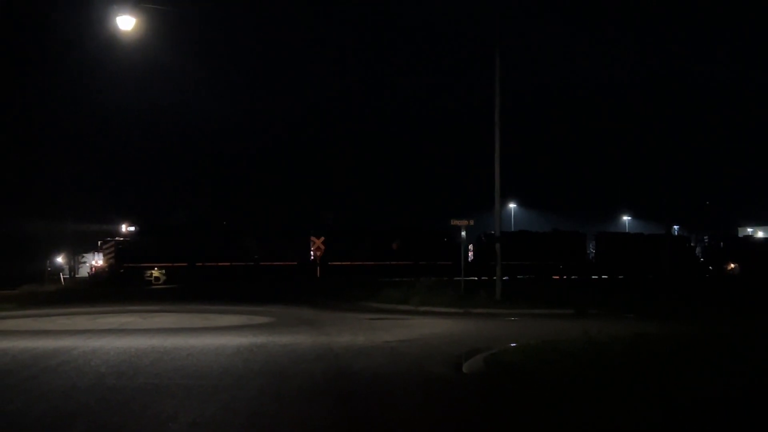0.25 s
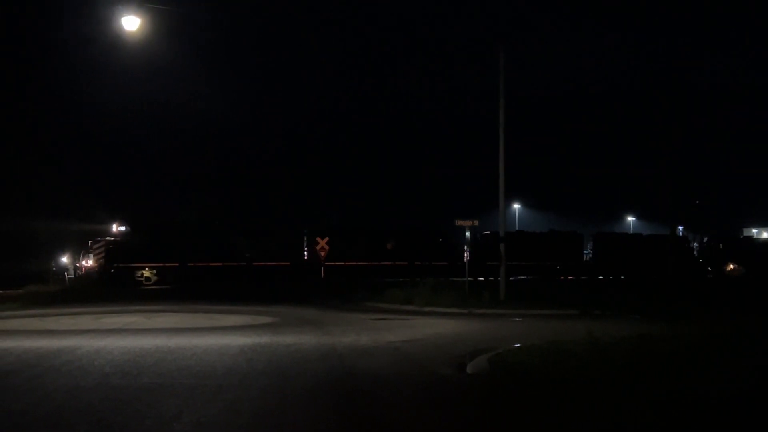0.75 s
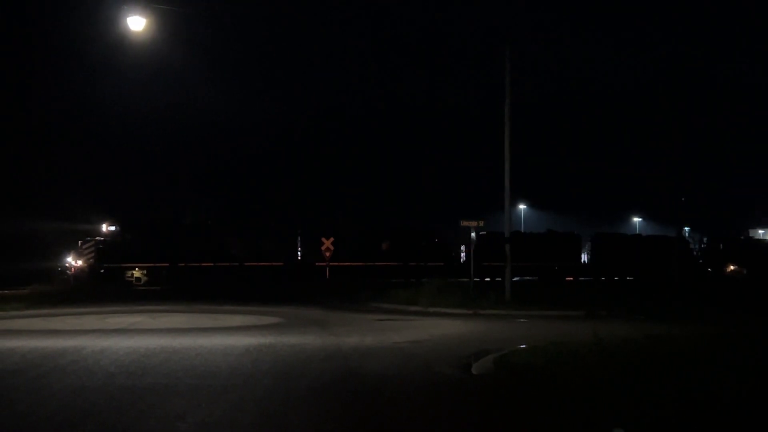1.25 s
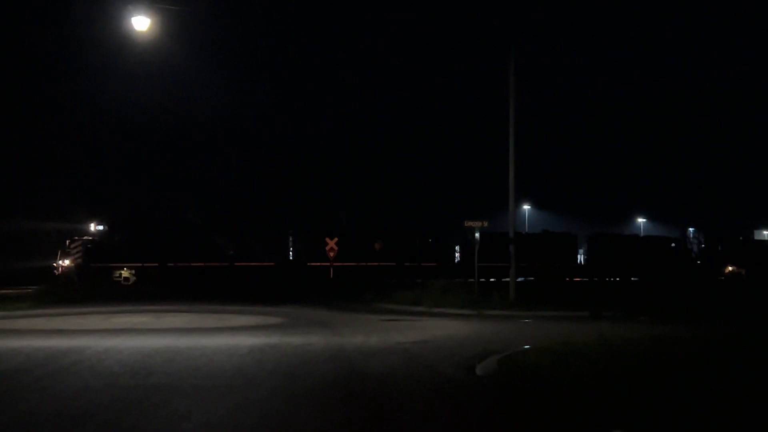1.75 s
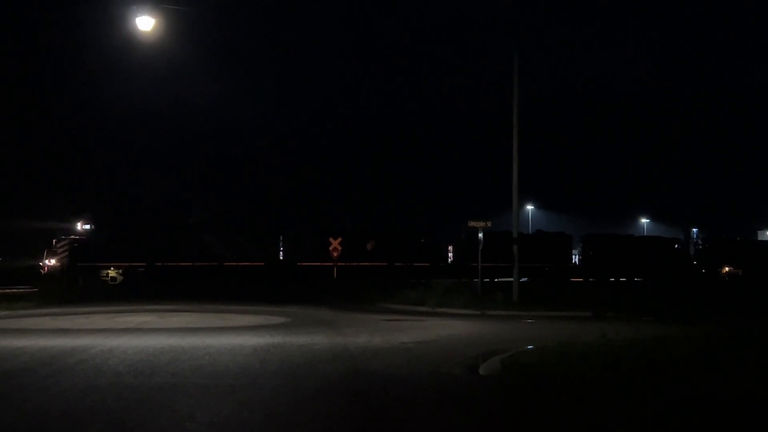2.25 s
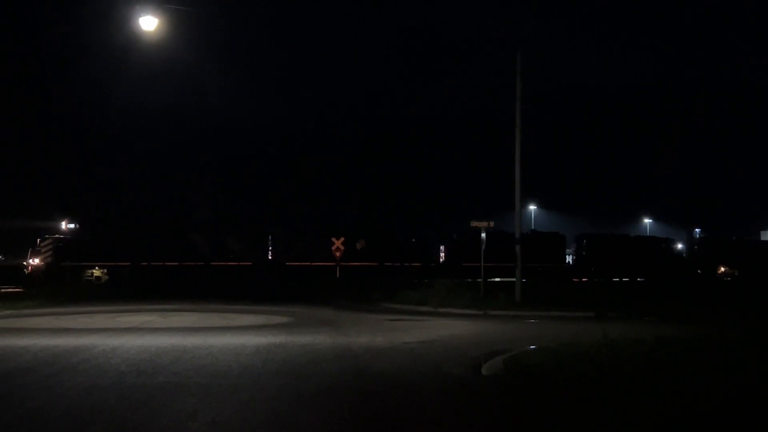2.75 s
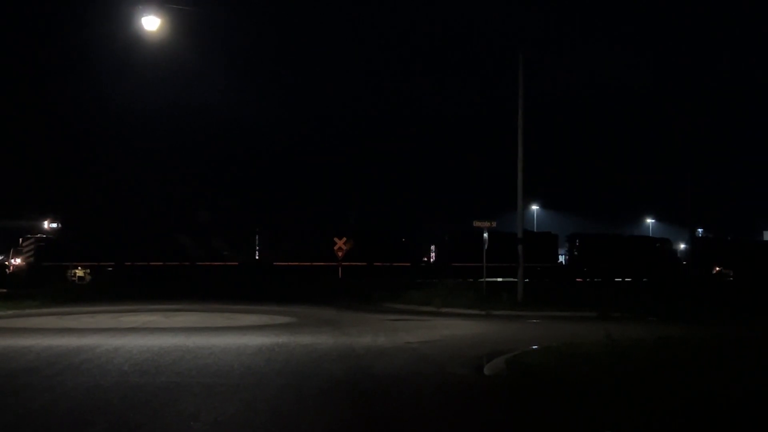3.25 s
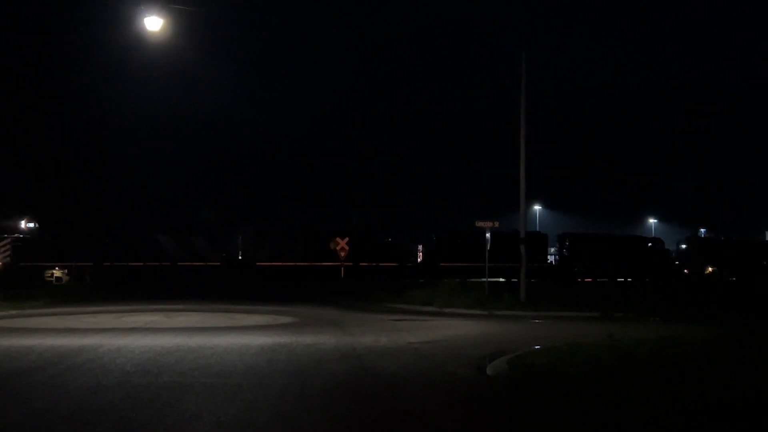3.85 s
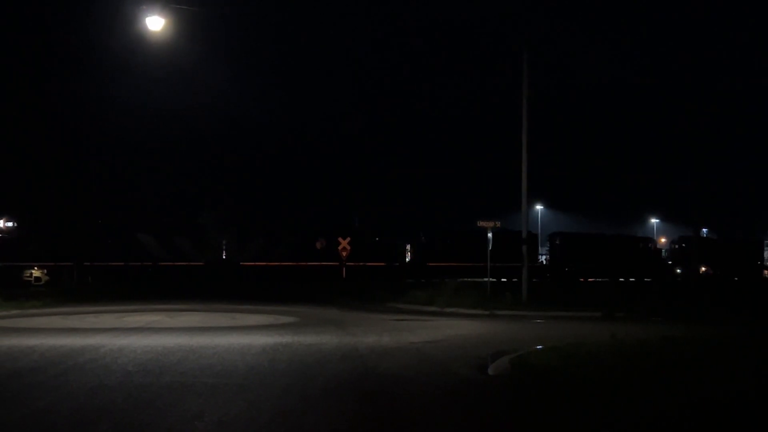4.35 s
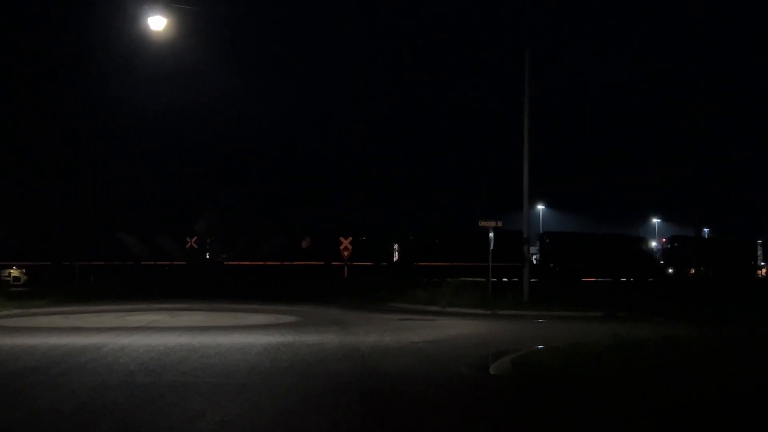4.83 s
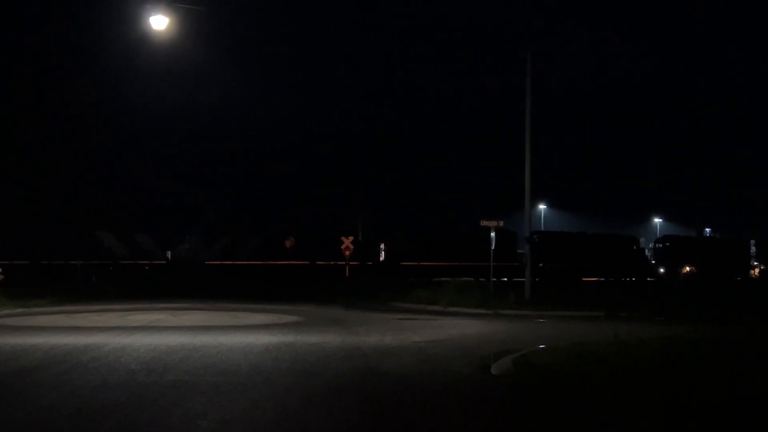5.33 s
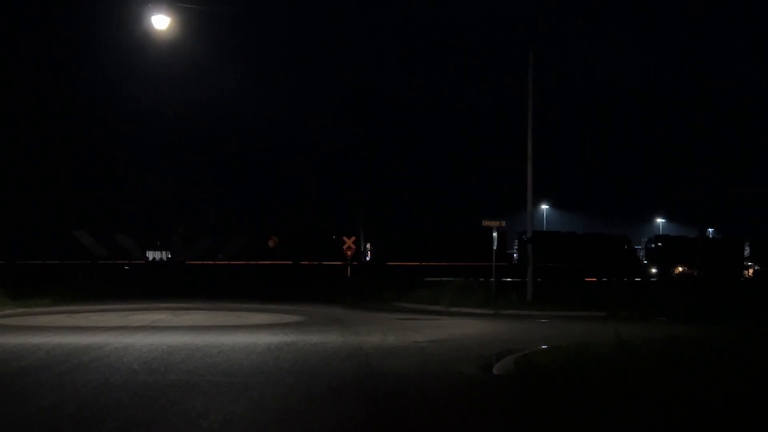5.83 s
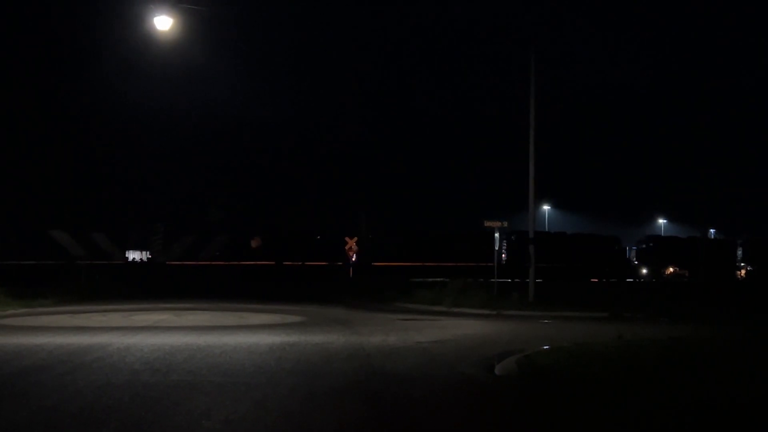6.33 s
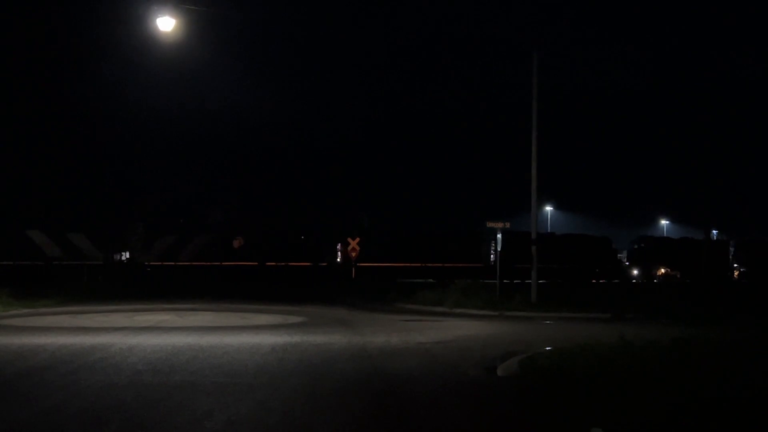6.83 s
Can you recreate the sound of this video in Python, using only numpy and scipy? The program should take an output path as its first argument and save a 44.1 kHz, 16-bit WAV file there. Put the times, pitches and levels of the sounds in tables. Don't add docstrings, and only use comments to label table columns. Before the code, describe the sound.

Open air at night beside a road crossing, a small stereo microphone some way from a freight train, with slightly dulled treble and little deep bass. From 0 s two large diesel locomotives work hard: dense, uneven exhaust throbs around 60 to 130 Hz slide in and out of step, under broad fan roar, wavering gear tones and a thin turbo whine near 6.8 kHz. A wheel clacks over a rail joint at 1.1 s, another more softly at 2.3 s. The whine and roar swell around 3 to 4 s; from 3.4 s rolling cars thicken the low roar and hollow ones start drumming near 90 Hz. From about 4.3 s both engines throttle down, beats slowing and whine gliding below 5 kHz by 7 s. Firm knocks land at 4.9 and 5.8 s, the latter with a thud. The lead engine's tones fade behind the cars, treble thins, and an empty car booms at 7 s.

```python
import sys
import numpy as np
from scipy import signal
from scipy.fft import rfft, irfft, next_fast_len
from scipy.io import wavfile

SR = 44100
rng = np.random.default_rng(int(sys.argv[2]) if len(sys.argv) > 2 else 0)


def dump_mix(stems):
    frames = np.atleast_2d(stems).T
    limited = np.clip(frames, -1, 1)
    pcm = np.round(limited * 32767).astype(np.int16)
    wavfile.write(sys.argv[1], SR, pcm)


def ratio_of_db(decibels):
    return 10 ** (np.asarray(decibels, float) / 20)


N = 312228
TIME = np.arange(N) / SR
LOG_HZ = np.log(np.fft.rfftfreq(2 * next_fast_len(N // 2 + 2048), 1 / SR) + 1)


def curves(table):
    s, *columns = np.transpose(table)
    return [np.interp(TIME, s, column) for column in columns]


def shape(x, table, turn=ratio_of_db):
    hz, value = np.transpose(table)
    padded = 2 * len(LOG_HZ) - 2
    gain = turn(np.interp(LOG_HZ, np.log(hz + 1), value))
    return irfft(rfft(x, padded) * gain, padded)[..., :N]


def unit(x):
    return x / np.sqrt(np.mean(np.abs(x) ** 2))


def walk(rate_hz):
    knots = rng.standard_normal(int(N / SR * rate_hz) + 2)
    whole, part = np.divmod(TIME * rate_hz, 1)
    whole = whole.astype(int)
    ease = part ** 2 * (3 - 2 * part)
    return 1.2 * (knots[whole] * (1 - ease) + knots[whole + 1] * ease)


def band(lo_hz, hi_hz, order=3):
    sos = signal.butter(order, [lo_hz, hi_hz], "band", fs=SR, output="sos")
    return unit(signal.sosfilt(sos, rng.standard_normal(N)))


def tone(turns, flutter_db, rate_hz):
    level = ratio_of_db(flutter_db * walk(rate_hz) + 1.8 * walk(60))
    wobble_turns = 0.043 * walk(rate_hz) + 0.05 * walk(60)
    return np.sqrt(2) * level * np.cos(2 * np.pi * (turns + wobble_turns))


def smear(turns, width_hz):
    return np.real((walk(width_hz) + 1j * walk(width_hz)) * np.exp(2j * np.pi * turns))


def beam(loudest_s, top_db, rise_db_per_s, fall_db_per_s):
    before_s = np.clip(loudest_s - TIME, 0, None)
    after_s = np.clip(TIME - loudest_s, 0, None)
    return top_db - rise_db_per_s * before_s - fall_db_per_s * after_s


def glints(rows):
    return sum(db * np.exp(-((TIME - s) / length_s) ** 2) for s, length_s, db in rows)


def crank_turns():
    # start_s, lead_cycles_per_s, second_cycles_per_s
    cycles = [(0.0, 7.975, 8.077), (1.5, 7.971, 8.031), (2.8, 7.961, 8.026), (3.4, 7.96, 8.015),
              (4.0, 7.957, 7.966), (4.3, 7.969, 7.945), (4.6, 7.851, 7.777), (4.9, 7.555, 7.587),
              (5.2, 7.361, 7.372), (5.5, 7.139, 7.199), (5.8, 6.88, 6.911), (6.1, 6.605, 6.628),
              (6.4, 6.373, 6.38), (6.7, 6.104, 6.042), (7.08, 5.722, 5.789)]
    cycle_start = (-.0246, -.0112)
    return [np.cumsum(rate) / SR + start for rate, start in zip(curves(cycles), cycle_start)]


def exhaust(turns, strengths):
    # cycle_multiple, level_db
    below = [(4, -52), (6, -48), (7, -38),
             (8, -17), (9, -23), (10, -26), (11, -28), (12, -33), (13, -28), (14, -38), (15, -36),
             (17, -35.5), (18, -36.5), (20, -41.5), (22, -39), (25, -40), (28, -48), (42, -41.5), (46, -53),
             (60, -46.5)]
    multiples, line_db = np.transpose(below)
    pattern = np.fft.fft(strengths)
    pattern[0] *= ratio_of_db(-27)
    step = 16
    slow = turns[::step]
    drift = [walk(3)[::step] for _ in range(7)]
    out = 0
    for k in range(4, 60):
        waver_turns = .006 * max(k - 19, 0) * drift[k % 7]
        gain = ratio_of_db(np.interp(k, multiples, line_db)) * pattern[k % 16]
        out = out + np.real(gain * np.exp(2j * np.pi * (k * slow + waver_turns)))
    return signal.resample_poly(out, step, 1)[:N]


def engines(lead, second):
    # start_s, lead_db, second_db
    effort = [(0.0, -0.0, -0.0), (1.5, 1.7, -0.8), (2.8, 2.8, 1.0), (3.4, 1.8, -0.7), (4.0, 3.6, 1.2),
              (4.3, 3.3, 1.4), (4.6, -0.7, 0.1), (4.9, -6.4, 0.9), (5.2, -2.2, -2.4), (5.5, -1.3, -3.8),
              (5.8, -1.8, -3.7), (6.1, -3.2, -1.8), (6.4, -3.3, -3.3), (6.7, -6.7, -8.0), (7.1, -5.7, -7.0)]
    cylinders = [(1.369, 0.672), (0.866, 0.636), (0.825, 0.823), (0.979, 1.31), (1.416, 1.016),
                 (0.545, 0.865), (1.187, 1.227), (1.258, 0.834), (1.059, 1.481), (0.889, 0.896),
                 (1.112, 1.079), (0.745, 1.077), (0.901, 1.138), (0.922, 1.36), (0.653, 0.993),
                 (1.275, 0.593)]
    parts = zip(curves(effort), (lead, second), np.transpose(cylinders))
    return sum(ratio_of_db(effort_db) * exhaust(turns, strengths) for effort_db, turns, strengths in parts)


def lead_gears(lead):
    shaft = (79.05, 201.7, 282.3, 559.8)
    # loudest_s, level_db, rise_db_per_s, fall_db_per_s
    beams = [(2.97, -34, 3.5, 2.5), (.4, -46, 3, 2.6), (.3, -49, -2, 1.5), (0.36, -50.5, 14, 3)]
    # start_s, length_s, level_db
    lead_glints = [
        [(.5, 0.087, -9), (5.0, 0.12, -15), (5.65, 0.099, 12), (6.0, .12, -8)],
        [(1.2, 0.22, -8), (1.55, 0.27, 5.5), (2.75, .15, -5), (4.3, 0.19, 4.5)],
        [(1.25, .2, -0.5), (2.7, .3, -3), (3.25, 0.14, 5), (4.8, 0.18, 2.5)],
        [(1.0, 0.34, -8), (1.5, 0.21, -0.5), (2.4, .7, -7.5), (4.95, .15, 9), (5.35, .2, 14), (5.75, 0.13, 14)],
    ]
    # cycle_multiple, level_db (below it)
    overtones = [(158.1, -20), (52.75, -9)]
    hidden_from_s, fades_db_per_s = 4.8, (7.8, 11, 5, 3.6)
    levels = [beam(*b) + beam(hidden_from_s, 0, 0, fade) + glints(g)
              for b, fade, g in zip(beams, fades_db_per_s, lead_glints)]
    out = sum(ratio_of_db(db) * tone(k * lead, 1.5, 5.2) for k, db in zip(shaft, levels))
    out = out + sum(ratio_of_db(levels[0] + db) * tone(k * lead, 2.2, 5) for k, db in overtones)
    vent = smear(632 * lead, 200)
    return out + ratio_of_db(beam(4.2, -60.5, 0, 14)) * vent


def second_gears(second):
    # loudest_s, level_db, rise_db_per_s, fall_db_per_s
    beams = [(5.1, -53.5, 2.2, 2), (5.4, -52, 1.5, 1.8), (5.2, -54, 0.87, .8)]
    # start_s, length_s, level_db
    mesh_glints = [
        [(1.12, 0.26, 9), (1.62, .2, -12), (4.15, .25, 5.5), (4.85, 0.11, 6), (5.1, 0.044, 8),
         (5.75, 0.12, -10), (6.25, 0.13, -5)],
        [(1.62, 0.28, 7), (2.9, 0.14, 4), (3.9, .2, 2), (4.6, .25, -11.5), (5.35, 0.17, 6.5), (6.25, 0.13, 6),
         (6.6, 0.091, -2)],
        [(1.0, 0.11, -5), (3.75, 0.16, 4.5), (5.3, .1, 2.5), (5.55, .1, -6), (5.95, 0.19, 6.5),
         (6.65, 0.078, -5)],
    ]
    mesh = 144.3 * second
    levels = [beam(*b) + glints(g) for b, g in zip(beams, mesh_glints)]
    return sum(ratio_of_db(db) * tone(k * mesh, 3., 22) for k, db in enumerate(levels, 1))


def turbo(blade_hz, second):
    # start_s, level_db
    whine = [(0, -53), (1, -52), (1.7, -45.5), (2.2, -50.5), (3.1, -45), (3.4, -41), (3.9, -46.5),
             (4.15, -46.5), (4.4, -46.5), (4.75, -44.5), (5.1, -48), (5.3, -44), (6.1, -43.5), (6.35, -53),
             (7.08, -54)]
    # loudest_s, level_db, rise_db_per_s, fall_db_per_s
    haze_beam = (4.3, -45.5, 0.99, 4.4), (5.9, 0, 0.25, 17)
    (turbo_db,) = curves(whine)
    haze_db = sum(beam(*b) for b in haze_beam) - turbo_db
    turns = np.cumsum(blade_hz) / SR
    line = tone(turns, 2.2, 30) * (1 + 0.69 * np.cos(2 * np.pi * 8 * second))
    haze = smear(.978 * turns, 420) * ratio_of_db(haze_db + 1.6 * walk(25))
    core = smear(.996 * turns, 160) * ratio_of_db(1.9 * walk(40))
    octave = smear(2 * turns, 600)
    third = smear(3 * turns, 900) * np.clip((5750 - blade_hz) / 500, 0, 1)
    mix = ratio_of_db(-3.5) * line + haze + ratio_of_db(-0.5) * core + ratio_of_db(-8.5) * octave + ratio_of_db(14.5) * third
    return ratio_of_db(turbo_db) * mix


def knocks():
    # start_s, level_db, centre_hz, length_s
    hits = [
        (1.105, -34, 1100, .03),
        (1.108, -41, 2800, .02),
        (2.28, -37, 850, .03),
        (4.94, -29.5, 950, .035),
        (5.785, -30.5, 900, .03),
        (5.815, -29, 280, .05),
    ]
    out = 0
    for s, db, hz, length_s in hits:
        u = np.clip((TIME - s) / length_s, 0, 40)
        out = out + ratio_of_db(db) * 8 * u * np.exp(-3 * u) * band(hz * 0.42, hz * 1.23)
    return out


def drumming_cars(exhausts):
    # pitch_hz, level_db
    resonance = [(66, -39), (82, 2.5), (100, 5.5), (130, -31.5)]
    since_s = np.clip(TIME - 3.77, 0, None)
    driven = 0.4 * since_s * shape(exhausts, resonance)
    rolling_db = -49.5 + 6 * since_s + glints([(7.0, 0.21, 12.5)])
    return driven + ratio_of_db(rolling_db) * band(82, 98, order=2)


def roar(blade_hz, lead):
    # pitch_hz, level_db (per Hz)
    colour = [(40, 2.5), (90, -4), (150, -1.5), (240, -5), (340, -3.5), (540, -8), (760, -17), (1200, -28),
              (2100, -21.5), (2600, -31.5), (3500, -29), (4200, -41), (5300, -34), (7800, -43)]
    # low_db, middle_db, high_db
    db_per_halving = (-2, -2, -13)
    # start_s, length_s, level_db
    nearing = [
        (2.1, 0.36, -0.5),
        (2.9, 0.53, 1),
        (4.4, 0.2, 1.5),
        (5.5, 0.38, 0.5),
        (6.6, 0.33, 0),
    ]
    # pitch_hz, level_db
    fine_colour = [(120, 1.5), (155, -1.5), (190, 0), (3700, 0), (4200, -1), (4700, 1)]
    low_db, mid_db, high_db = (db * np.log2(blade_hz[0] / blade_hz) for db in db_per_halving)
    low_db = low_db + 3 * np.clip((TIME - 3.4) / 0.35, 0, 1)
    low_db, mid_db, high_db = (db - db.mean() for db in (low_db, mid_db, high_db))
    beat = np.cos(2 * np.pi * (lead + 0.15))
    colour_hz, colour_db = np.transpose(colour)
    swell_db = 0.33 * walk(1.46) + glints(nearing)
    out = 0
    for hz in 45 * 2 ** np.arange(0, 8.5, 1 / 3):
        w = np.clip(np.log2(hz / 350) / 1.28, 0, 2)
        db = low_db * max(1 - w, 0) + mid_db * (1 - abs(w - 1)) + high_db * max(w - 1, 0)
        db = db + np.interp(np.log(hz), np.log(colour_hz), colour_db)
        db = db + 10 * np.log10(hz / 300)
        throb_db = 0.12 + 1.8 / (1 + (hz / 260) ** 4)
        db = db + swell_db + 0.95 * walk(9) + throb_db * beat
        out = out + ratio_of_db(db) * band(hz * 0.843, hz * 1.138, order=2)
    return shape(ratio_of_db(-32) * out, fine_colour)


def two_ports(mid, rest):
    # pitch_hz, level_db
    apart = [(100, -56), (400, -29.5), (900, -10), (1800, -17), (2400, -24.5), (3500, -8), (5000, -14),
             (6800, -31.5), (9000, -21.5), (12000, -26.5)]
    # pitch_hz, level_db
    port_db = [(60, 1.5), (100, 1.5), (180, 2.0), (300, 2.0), (510, 1.5), (880, 5.5), (1500, 1.5),
               (2570, 0.0), (4390, 0.0), (7510, 0.0)]
    # pitch_hz, lead_rad
    port_rad = [(30, .09), (400, .09), (750, .3), (1120, -.2), (1810, -.15), (2500, 0), (3500, .55),
                (5250, .1), (6800, .04)]
    # pitch_hz, lead_half_turns
    treble_turns = [(8200, .05), (9300, .45), (10300, 1), (11200, 1.6), (12000, 2), (12900, 2.5),
                    (14000, 3), (15400, 4)]
    leads = list(port_rad) + [(hz, np.pi * half_turns) for hz, half_turns in treble_turns]
    side = shape(np.roll(rest, 3000), apart)
    ports = []
    for sign in (1, -1):
        port = shape(mid, port_db, lambda db: ratio_of_db(sign * db / 2))
        port = shape(port, leads, lambda rad: np.exp(.5j * sign * rad))
        ports.append(port + sign * side)
    return np.array(ports)


def scene():
    # start_s, blade_hz
    blade = [(0, 6815), (1, 6805), (2.2, 6799), (3.4, 6788), (3.9, 6775), (4.2, 6755), (4.4, 6710),
             (4.65, 6570), (4.9, 6410), (5.3, 6165), (5.8, 5805), (6.1, 5580), (6.6, 5195), (7.08, 4835)]
    (blade_hz,) = curves(blade)
    lead, second = crank_turns()
    exhausts = engines(lead, second)
    whines = lead_gears(lead) + second_gears(second) + turbo(blade_hz, second)
    rest = whines + knocks() + roar(blade_hz, lead)
    return two_ports(exhausts + drumming_cars(exhausts) + rest, rest)


def low_pass(x):
    return signal.sosfilt(signal.butter(12, 15720, fs=SR, output="sos"), x)


def record(dry):
    # pitch_hz, level_db
    air = [(7800, -2.5), (9000, -7.5), (10200, -10.5), (11800, -12.5), (13400, -13), (14500, -30.5),
           (16000, -38.5)]
    heard = shape(dry, [(20, -17.5), (36, -9), (48, 0)] + air)
    heard = np.tanh(.85 * heard) / .85 * 1.04
    return low_pass(heard)


dry = scene()
out = record(dry)
dump_mix(out)
```